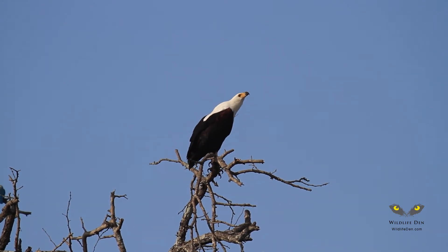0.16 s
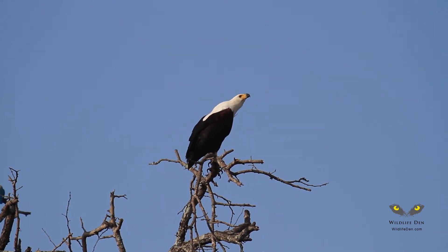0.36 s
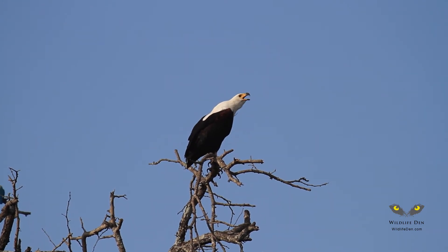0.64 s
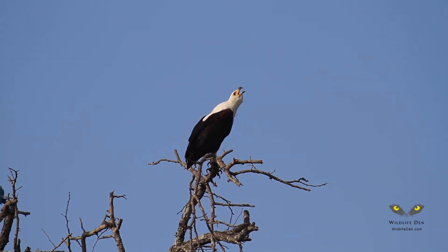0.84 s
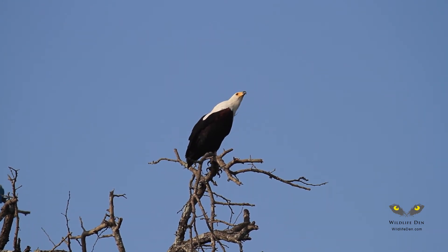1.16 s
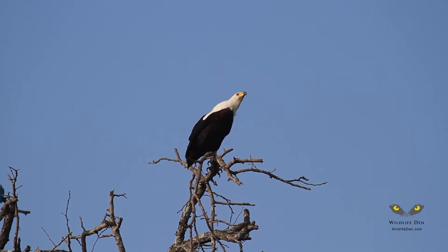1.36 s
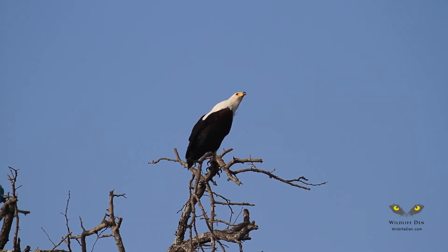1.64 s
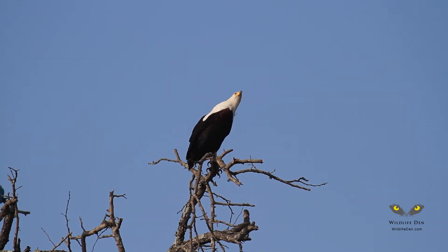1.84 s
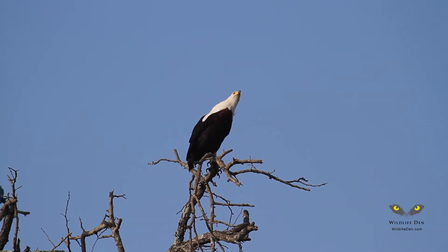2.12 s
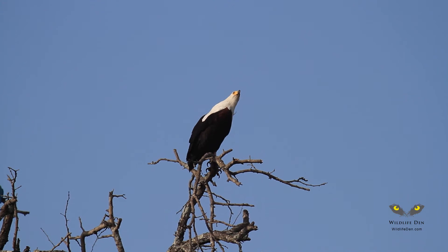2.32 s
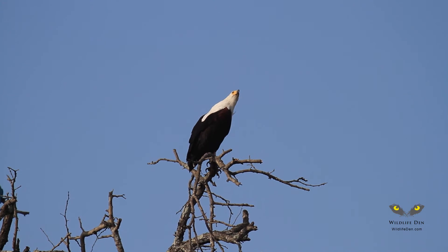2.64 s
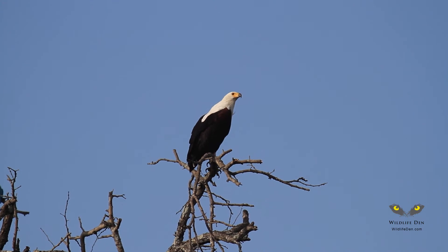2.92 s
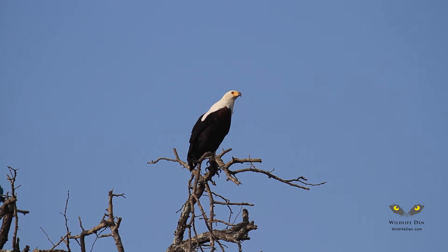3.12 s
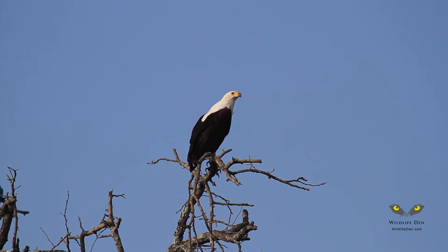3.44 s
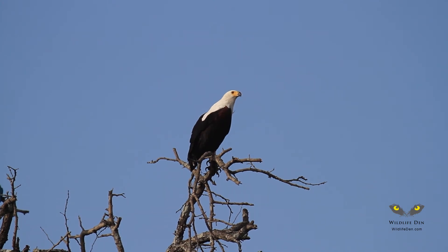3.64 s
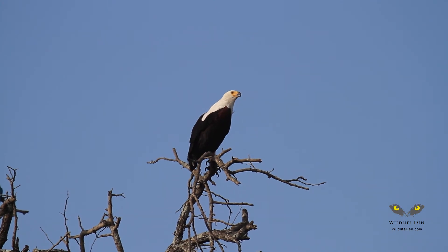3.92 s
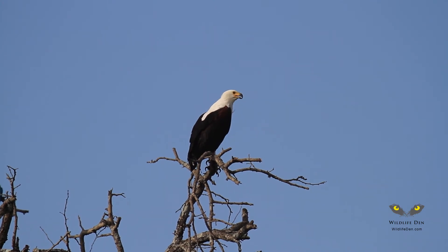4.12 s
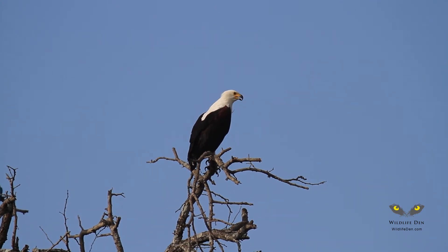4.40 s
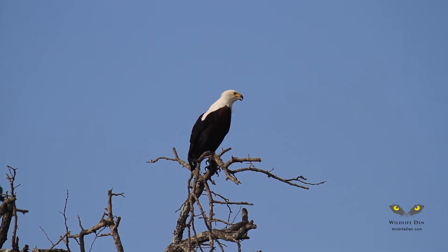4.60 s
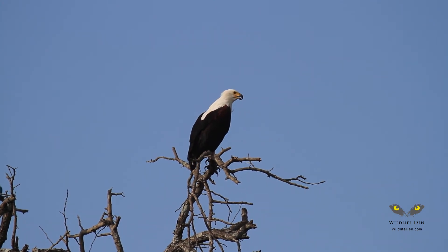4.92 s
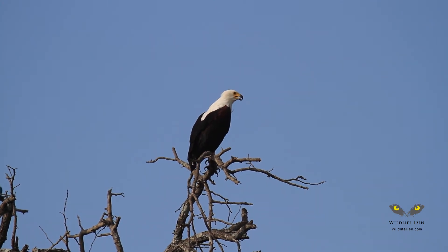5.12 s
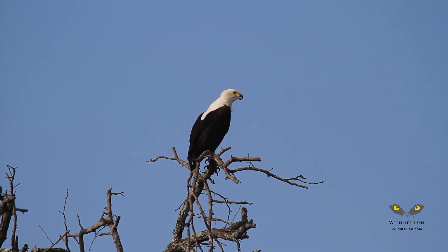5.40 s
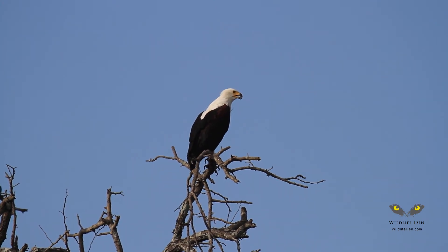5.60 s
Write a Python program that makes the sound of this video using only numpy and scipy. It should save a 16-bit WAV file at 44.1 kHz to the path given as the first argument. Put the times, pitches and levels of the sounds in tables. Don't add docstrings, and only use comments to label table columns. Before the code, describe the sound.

Loud eagle calls open the scene outdoors: a short clear yelp falls from the first instant to 0.2 s, overlapped by a higher, hoarser mate. At about 0.8 s a longer yelp begins with a cracked rasp, leaps up and sags away by 1.15 s. Trees return quick echoes and a far bank a duller, longer tail. No further eagle calls follow. Underneath lie a faint hollow drone, soft air hiss and insect haze, with two thin, high insects buzzing in pulsing bouts. From 0.6 s a small bird gives tiny falling chips, soon roughly every 0.4 s until the end. Close camera knocks cluster at 0.2-0.3 s, with scattered dry ticks and soft scrapes at 2.1 and 2.7 s. A very low, faint motor hum winds up from 1.3 s, cuts at 2.3 and coasts to 3. A short groan drops at 2.5 s; a faint peep rises at 4 s; sharp snaps hit at 4.4 and 4.6 s.

```python
import sys
import numpy as np
from scipy import signal
from scipy.fft import rfft, irfft, next_fast_len
from scipy.io import wavfile
from scipy.ndimage import map_coordinates

SR = 44100
rng = np.random.default_rng(int(sys.argv[2]) if len(sys.argv) > 2 else 0)


def voltage_ratio(level):
    return 10 ** (np.asarray(level, float) / 20)


def dump(signal):
    limited = np.clip(np.atleast_2d(signal).T, -1, 1)
    pcm = np.round(limited * 32767).astype(np.int16)
    wavfile.write(sys.argv[1], SR, pcm)


N = 254016
T = np.arange(N) / SR

# (time [s], pitch [Hz], effort [dB], beak opening [dB])
NEAR_YELPS = [
    [(0, 975, -15, -29), (.042, 962, -20.5, -23.5), (.062, 941.4, -22, -28.5), (.105, 929, -22, -29),
     (.132, 814, -24.5, -46), (.16, 688, -31, -65), (.18, 650, -41, -52)],
    [(.79, 706, -35, -45), (.818, 919, -34, -40), (.834, 1019, -18, -30.5), (.862, 1055, -20, -33.5),
     (.9, 1024, -17.5, -32.5), (.945, 961.4, -21, -31.5), (1.05, 927.6, -20, -30),
     (1.085, 844.4, -23.5, -38), (1.15, 612, -35.5, -56)],
]


def unit(x):
    return x / np.sqrt(np.mean(x ** 2) + 1e-20)


def along(points, hz):
    f, v = np.transpose(points)
    return np.interp(np.log(hz + 1), np.log(f + 1), v)


def wobble(rate, n=N):
    knots = rng.standard_normal(int(n * 2000 / SR) + 4)
    return map_coordinates(knots, [np.arange(n) * min(rate, 1990) / SR])


def filtered(x, response):
    m = next_fast_len(len(x) + SR // 2)
    return irfft(rfft(x, m) * response(np.fft.rfftfreq(m, 1 / SR)), m)[:len(x)]


def resonant(modes):
    def response(f):
        total = 0
        for k, (c, w, db) in enumerate(modes):
            total = total + (-1) ** k * voltage_ratio(db) * 1j * f * w / (c * c - f * f + 1j * f * w + 1e-9)
        return total
    return response


def note(rows, start=0.):
    s, *cols = np.transpose(rows)
    t = np.arange(round((s[-1] - s[0]) * SR)) / SR + s[0]
    already_on = s[0] + start < .002
    edge = np.clip(np.minimum(t - s[0] + already_on, s[-1] - t) / min(.006, s[-1] / 8), 0, 1)
    first = max(round((s[0] + start) * SR), 0)
    return slice(first, first + len(t)), edge, [np.interp(t, s, c) for c in cols]


def glide(rows, start=0., db=0.):
    out = np.zeros(N + SR)
    where, edge, (hz, level_db) = note(rows, start)
    out[where] = np.sqrt(2) * edge * voltage_ratio(level_db + db) * np.sin(2 * np.pi * np.cumsum(hz) / SR)
    return out[:N]


def yelp(rows, hoarse_db, order, top_db):
    # (pitch [Hz], level [dB])
    windpipe = [(700, -10), (893, -12), (926, -3), (955, -11.5), (972, -34), (998, -5.5), (1016, -10),
                (1046, 1)]
    # (frequency [Hz], level [dB])
    throat = [(2000, 27), (2500, 10.5), (2900, -21.5), (3150, 3.5), (3800, -1.5), (4300, 3.5), (5000, -2.5),
              (6200, -8.5), (7300, -8), (8300, -15.5), (9400, -11), (10500, -10.5), (11500, -12.5),
              (14500, -25)]
    second_db, second_follows, half_open_db = -22, .3, -39
    top_db_per_hz, taut_hz = 0.12, 1046
    out = np.zeros(N)
    where, edge, (hz, effort_db, beak_db) = note(rows)
    hz = signal.savgol_filter(hz, 601, 1)
    n = len(hz)
    phase = 2 * np.pi * np.cumsum(hz) / SR
    for k in range(1, 15):
        if k == 1:
            colour_db = along(windpipe, hz)
        elif k == 2:
            nearly_shut_db = np.minimum(beak_db - half_open_db, 0)
            colour_db = second_db + second_follows * nearly_shut_db + 4.0 * wobble(49.5, n)
        else:
            colour_db = beak_db + along(throat, k * hz) + 2.4 * wobble(24.7, n) + 3.15 * wobble(75.6, n)
            if k >= order:
                sag_hz = np.minimum(hz - taut_hz, 0)
                colour_db += top_db + (k - order + 1) ** .5 * top_db_per_hz * sag_hz
        roughness = k * voltage_ratio(hoarse_db)
        smear = roughness * (wobble(300, n) + 1j * wobble(305, n))
        line = np.imag((1 + smear) * np.exp(1j * k * phase)) / np.sqrt(1 + 2 * roughness ** 2)
        out[where] += np.sqrt(2) * edge * voltage_ratio(effort_db + colour_db) * (k * hz < 15000) * line
    return out


def echo(x, decay, gap):
    hz, t, z = signal.stft(rng.standard_normal(2 * SR), SR, nperseg=256)
    tail = signal.istft(z * voltage_ratio(-60 * t / along(decay, hz)[:, None]), SR, nperseg=256)[1]
    tail = tail * np.clip(np.arange(len(tail)) / SR / gap, 0, 1)
    wet = signal.fftconvolve(x, tail / np.linalg.norm(tail))[:N]
    sway_s = 4.5e-5 * wobble(40)
    return map_coordinates(wet, [(T + sway_s) * SR])


def placed(call, trees_db, bank_db):
    # (frequency [Hz], t60 [s])
    trees = [(500, 0.29), (1000, 0.51), (2000, 0.56), (4000, 0.57), (9000, 0.27)]
    # (frequency [Hz], t60 [s])
    bank = [(500, 3.3), (1000, 1.6), (2000, 3.16), (4000, 2.3), (9000, 0.1)]
    far = filtered(echo(call, bank, 0.095), lambda f: 1 / (1 + (f / 1600) ** 4))
    return call + voltage_ratio(trees_db) * echo(call, trees, 0.019) + voltage_ratio(bank_db) * far


def fading():
    # (centre [Hz], width [Hz], level [dB], t60 [s])
    lingering = [(1000, 41, -40, 1.9), (1300, 113, -34, 1.56), (1472, 190, -37, 1.62),
                 (1900, 180, -48.5, 1.3), (2630, 400, -55.5, 3.1), (3840, 1100, -52, 1.76)]
    out = np.zeros(N)
    for hz, width, db, t60 in lingering:
        band = filtered(rng.standard_normal(N), lambda f: np.exp(-((f - hz) / width) ** 2))
        out += voltage_ratio(db - 60 * T / t60) * unit(band)
    return out


def eagles():
    # (time [s], pitch [Hz], effort [dB], beak opening [dB])
    mate_yelp = [(.01, 1208, -49, -39), (.03, 1304, -30, -30), (.045, 1320, -25.5, -27),
                 (.1, 1323, -30.5, -19), (.135, 1298, -35.5, -9), (.165, 1277, -27.5, -34),
                 (.19, 1249, -35.5, -57), (.205, 1231, -26, -54), (.225, 1205, -46, -52)]
    first = yelp(NEAR_YELPS[0], hoarse_db=-39, order=7, top_db=2.0)
    mate = yelp(mate_yelp, hoarse_db=-16, order=4, top_db=-9.5)
    last = yelp(NEAR_YELPS[1], hoarse_db=-37, order=7, top_db=4.0) + crack()
    calls = placed(first, -9.5, -19.0) + placed(mate, -7.5, -15.5) + placed(last, -12.5, -20.0)
    return calls + fading()


def breath():
    # (centre [Hz], width [Hz], level [dB])
    hiss_modes = [(2900, 1500, 3), (5200, 1400, 0), (12000, 4400, -3)]
    over_beak_db = -10
    out = np.zeros(N)
    for rows in NEAR_YELPS:
        where, edge, (hz, effort_db, beak_db) = note(rows)
        hiss = unit(filtered(rng.standard_normal(len(hz)), resonant(hiss_modes)))
        out[where] = edge * voltage_ratio(effort_db + beak_db + over_beak_db) * hiss
    return out


def drone():
    # (centre [Hz], width [Hz], level [dB])
    hollow = [(273, 32.4, -10.5), (358.2, 21.5, -5.5), (446.7, 22.7, 0), (514, 20.6, -3.5), (536, 22, -3),
              (650, 27, -10.5), (711, 43, -9), (803, 74, -14.5), (1300, 85, -17.5)]
    start_db, recedes_db_per_s = -52, 0.46
    lumps = voltage_ratio(2.02 * wobble(35) + 0.61 * wobble(4.64)) * rng.standard_normal(N)
    band = lambda f: resonant(hollow)(f) / (1 + (200 / (f + 1)) ** 4) / (1 + (f / 1500) ** 4)
    return voltage_ratio(start_db - recedes_db_per_s * T) * unit(filtered(lumps, band))


def haze():
    # (centre [Hz], width [Hz], level [dB])
    far_insects = [(3800, 88, 0.5), (6740, 80, -1), (7260, 99, 1.5), (9400, 250, -0.5), (12200, 1400, -3.5)]
    bands = filtered(rng.standard_normal(N), lambda f: resonant(far_insects)(f) ** 2)
    return voltage_ratio(-70.5 + 1.9 * wobble(1.2)) * unit(bands)


def air():
    # (frequency [Hz], density [dB per Hz])
    hiss_spectrum = [(20, -11), (60, -1), (150, 0.5), (400, 7.5), (900, -0.5), (2000, -5), (4000, -6),
                     (6500, -8), (10000, -10), (12500, -9), (15000, -11), (16000, -18.5)]
    drift_db = .3 * wobble(3)
    hiss = filtered(rng.standard_normal(N), lambda f: voltage_ratio(along(hiss_spectrum, f)))
    return voltage_ratio(-56 + drift_db) * unit(hiss)


def buzz(bouts, bodies, pulse_hz, depth, fade, far_db, swell_db):
    stroke_hz = pulse_hz * (1 + 0.0137 * wobble(4.41))
    stroke = 1 + np.clip(depth, 0, 1) * np.sin(2 * np.pi * np.cumsum(stroke_hz) / SR)

    def band(body):
        middle_hz = np.mean(body, 0)[0]
        return lambda f: resonant(body)(f) * np.exp(-((f - middle_hz) / 650) ** 2)

    slack, tense = (unit(stroke * filtered(rng.standard_normal(N), band(body))) for body in bodies)
    out = voltage_ratio(far_db) * unit(filtered(rng.standard_normal(N), band(bodies[0])))
    for start, end, end_db in bouts:
        done = np.clip((T - start) / (end - start), 0, 1)
        gate = np.clip(np.minimum((T - start) / (3 * fade) + .5, (end - T) / fade + 1), 0, 1)
        voice = np.sqrt(1 - done) * slack + np.sqrt(done) * tense
        out += gate * voltage_ratio(end_db - swell_db * (1 - np.sqrt(done))) * voice
    return out


def cicadas():
    # (start [s], end [s], level at end [dB])
    bouts = [(0, .3, -59.5), (.34, .78, -58.5), (1.03, 1.88, -60), (2.19, 3.01, -60.5), (3.28, 4.11, -60),
             (4.3, 5.18, -61), (5.38, 5.76, -63.5)]
    # (centre [Hz], width [Hz], level [dB])
    bodies = [
        [(8715, 520, -6), (9100, 76, -7)],
        [(9120, 140, 1.5), (8780, 700, -7.5)],
    ]
    return buzz(bouts, bodies, pulse_hz=77.5, depth=.4, fade=.06, far_db=-69, swell_db=4.5)


def bursts(rows, breadth, rise, db, strike=0):
    out, t = np.zeros(N + SR), np.arange(SR // 4) / SR
    for s, peak_db, hz, t60 in rows:
        shape = voltage_ratio(-60 * t / t60) * (1 - np.exp(-t / (rise * t60)))
        push = rng.standard_normal(len(t)) * shape + strike * (t == 0)
        burst = filtered(push, lambda f: resonant([(hz, breadth * hz, 0)])(f) ** 2)
        out[round(s * SR):][:len(t)] += voltage_ratio(peak_db + db) * burst / np.abs(burst).max()
    return out[:N]


def camera_body():
    # (time [s], peak [dB], centre [Hz], t60 [s])
    knocks = [(.003, -62, 82, 0.15), (.168, -36, 2600, .02), (.213, -40, 6000, .015),
              (.2275, -26.5, 2860, 0.011), (.228, -35, 418, 0.01), (.245, -35, 2560, 0.019),
              (.316, -44, 3180, 0.039), (.272, -56, 74.7, 0.12), (.277, -33, 389, 0.0095),
              (.289, -38.5, 3800, 0.026), (1.195, -44, 3900, .02), (.998, -44, 5540, 0.0097),
              (1.145, -49, 3800, .03), (1.32, -46.5, 4010, .02), (2.064, -38, 1080, 0.09),
              (2.334, -47, 1300, 0.013), (.236, -41, 13200, .04), (4.446, -38.5, 11390, 0.081),
              (5.014, -40.5, 6500, 0.019)]
    # (time [s], peak [dB], centre [Hz], t60 [s])
    snaps = [(.2272, -35, 6030, 0.0092), (.275, -41, 218, 0.16), (4.4444, -26, 9500, 0.024),
             (4.4444, -33, 4200, 0.026), (4.6072, -27.5, 2840, 0.028), (4.611, -50, 3800, 0.019)]
    # (time [s], peak [dB], centre [Hz], t60 [s])
    scrapes = [(.375, -42, 580, 0.16), (1.46, -64, 66.4, 0.24), (2.064, -42.5, 1720, 0.08),
               (2.066, -44.5, 7100, 0.058), (2.066, -46, 13000, 0.066), (2.7, -50.5, 1200, 0.24),
               (2.71, -58, 2620, 0.13), (2.775, -44.5, 1410, 0.13)]
    # (time [s], peak [dB], centre [Hz])
    ticks = [(0.74, -37, 11640), (1.006, -43, 14800), (1.087, -42, 10600), (1.2316, -37, 13270),
             (1.939, -34, 12040), (1.9884, -43, 13600), (2.098, -39, 10600), (2.5112, -46, 13100),
             (2.593, -37, 12800), (3.5049, -47, 12800), (3.5848, -34, 14200), (3.9883, -39, 13400),
             (4.1745, -32.5, 11000), (4.3061, -35, 13100), (4.4444, -20, 12200), (5.5593, -50, 13380)]
    tick_t60_s = .0097
    out = bursts(knocks, breadth=0.5, rise=0.0044, db=0.3)
    out += bursts(snaps, breadth=2.82, rise=0.0063, db=-1.6, strike=4.8)
    out += bursts(scrapes, breadth=0.51, rise=0.26, db=2.2)
    out += bursts([(*row, tick_t60_s) for row in ticks], breadth=0.24, rise=0.011, db=-7.5, strike=2.1)
    return out


def crickets():
    # (start [s], end [s], level at end [dB])
    bouts = [(.42, .68, -65), (.98, 1.26, -64), (1.56, 1.86, -67), (2.04, 2.42, -67), (2.75, 3.05, -66.5),
             (3.33, 3.48, -71), (3.52, 3.69, -63.5), (4.14, 4.42, -66.5), (4.68, 5.0, -69),
             (5.11, 5.17, -66), (5.34, 5.6, -67.5)]
    # (centre [Hz], width [Hz], level [dB])
    bodies = [
        [(4840, 530, -8), (5290, 440, -8)],
        [(4600, 2600, -9), (5280, 730, -4)],
    ]
    return buzz(bouts, bodies, pulse_hz=104, depth=0.42, fade=0.034, far_db=-74.0, swell_db=-1.5)


def chip():
    from_hz, to_hz, fall_s, length_s = 6600, 2974, .011, .024
    peak_s, rise_db, fade_db = 0.0083, 3.5, 11.5
    s = np.linspace(0, length_s, 25)
    hz = to_hz + (from_hz - to_hz) * np.exp(-s / fall_s)
    level_db = np.interp(s, [0, peak_s, length_s], [-rise_db, 0, -fade_db])
    return np.transpose([s, hz, level_db])


def small_bird():
    # (time [s], peak [dB])
    calls = [(0.611, -47), (1.474, -43.5), (1.852, -44.5), (2.2255, -45), (2.608, -45), (2.9602, -44),
             (3.322, -43), (3.701, -42), (4.0693, -43), (4.5655, -43), (4.9386, -42.5), (5.3012, -41.5),
             (5.6475, -41.5)]
    chips = sum(glide(chip(), s - .0022, db - 11.5) for s, db in calls) * voltage_ratio(2.2 * wobble(350))
    t = np.arange(SR // 4) / SR
    leaves = rng.standard_normal(len(t)) * voltage_ratio(-60 * t / 0.3)
    return chips + voltage_ratio(1.5) * signal.fftconvolve(chips, leaves / np.linalg.norm(leaves))[:N]


def crack():
    # (time [s], level [dB], brightness [dB])
    breaking = [(.79, -51, -16), (.802, -37, -10), (.812, -32, -23), (.822, -35, 0), (.83, -34, -3),
                (.842, -60, -20)]
    # (centre [Hz], width [Hz], level [dB])
    rasp = [(1220, 620, 3), (1565, 410, 2.5)]
    # (centre [Hz], width [Hz], level [dB])
    rasp_edge = [(2100, 860, 3.5), (3800, 590, 3.5), (8100, 8300, -8.5)]
    out = np.zeros(N)
    where, edge, (level_db, bright_db) = note(breaking)
    flaps = voltage_ratio(2.1 * wobble(538, len(edge))) * rng.standard_normal(len(edge))
    low, high = (unit(filtered(filtered(flaps, resonant(m)), resonant(m))) for m in (rasp, rasp_edge))
    out[where] = edge * voltage_ratio(level_db) * (low + voltage_ratio(bright_db) * high)
    return out


def motor():
    on_s, cut_s, still_s = 1.34, 2.34, 3.05
    idle_hz, full_hz, wind_up_s, coast_s = 24, 62.3, 0.86, 0.86
    full_db, louder_with_speed = -63, 2.7
    slack_db, slack_s = 16, .04
    s = np.linspace(on_s, still_s, 200)
    hz = idle_hz + (full_hz - idle_hz) * np.sin(np.pi / 2 * np.clip((s - on_s) / wind_up_s, 0, 1))
    hz = hz * np.exp(-np.maximum(s - cut_s, 0) / coast_s)
    level_db = full_db + louder_with_speed * 20 * np.log10(hz / full_hz)
    level_db -= slack_db * np.exp(-((s - cut_s - slack_s) / slack_s) ** 2)
    return glide(np.transpose([s, hz, level_db])) * voltage_ratio(1.6 * wobble(20.0))


def groan():
    # (time [s], pitch [Hz], level [dB])
    falling = [(2.49, 239, -67), (2.525, 218, -54.5), (2.56, 159, -57.5), (2.6, 105, -67), (2.63, 84, -78)]
    return glide(falling)


def peep():
    # (time [s], pitch [Hz], level [dB])
    rising = [(4.005, 2050, -66), (4.015, 2380, -59), (4.028, 2950, -66)]
    return glide(rising)


def scene():
    birds = eagles() + breath() + small_bird() + peep()
    insects = haze() + cicadas() + crickets()
    distance = drone() + air()
    handling = camera_body() + motor() + groan()
    return (birds + insects + distance + handling)[None]


def low_pass(x):
    return signal.sosfilt(signal.butter(12, 16440, fs=SR, output="sos"), x)


def record(dry):
    top_hz = 15830
    mix = filtered(dry[0], lambda f: (f < top_hz) / np.sqrt(1 + (f / 14500) ** 12))[None]
    return low_pass(mix)


dry = scene()
out = record(dry)
dump(out)
```